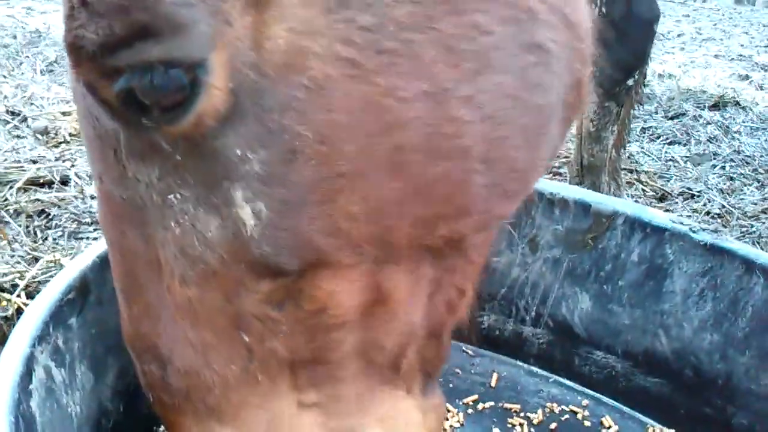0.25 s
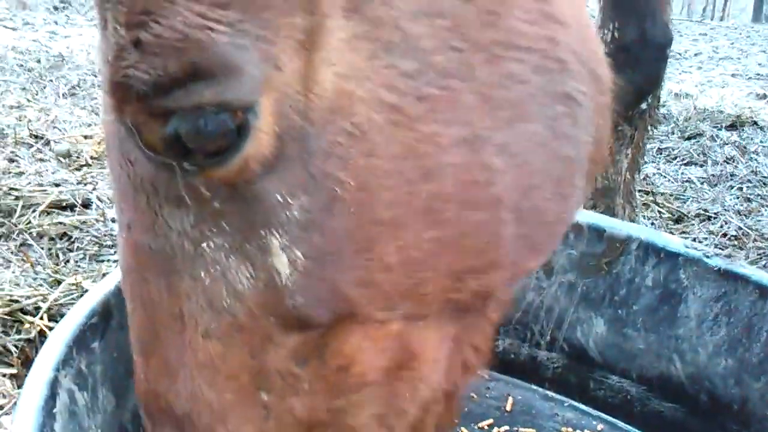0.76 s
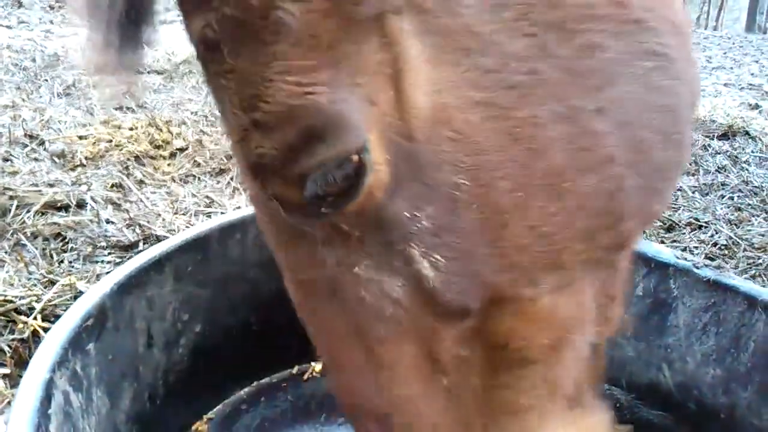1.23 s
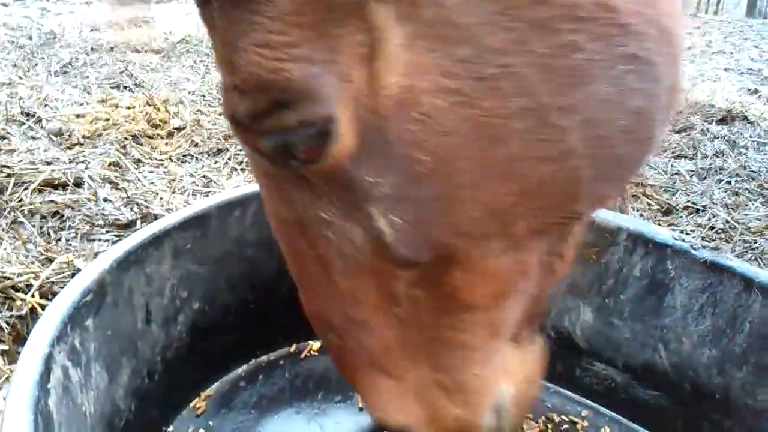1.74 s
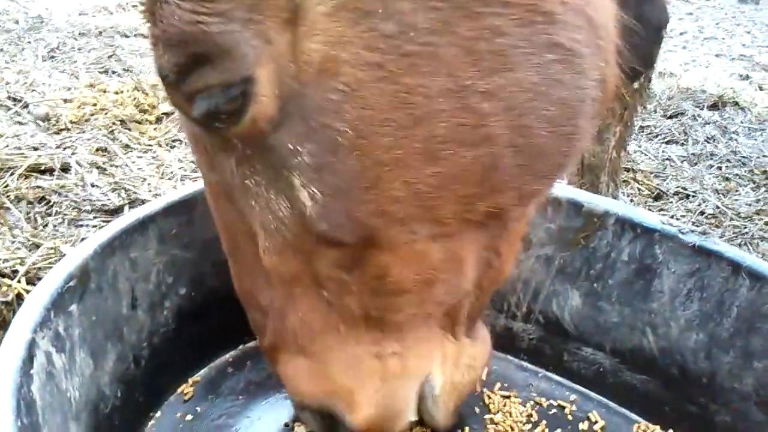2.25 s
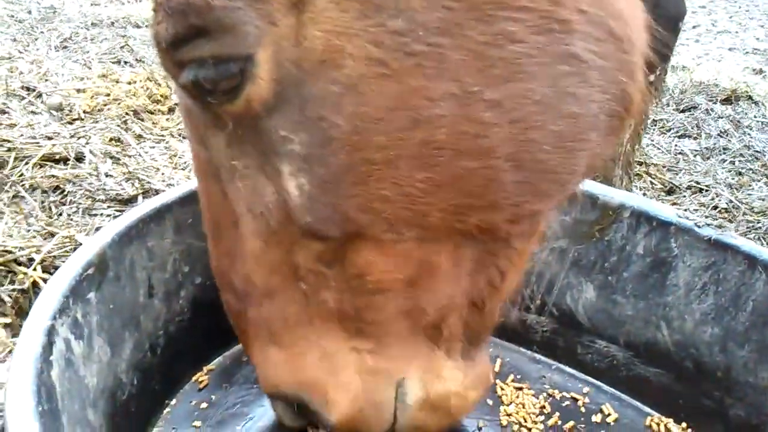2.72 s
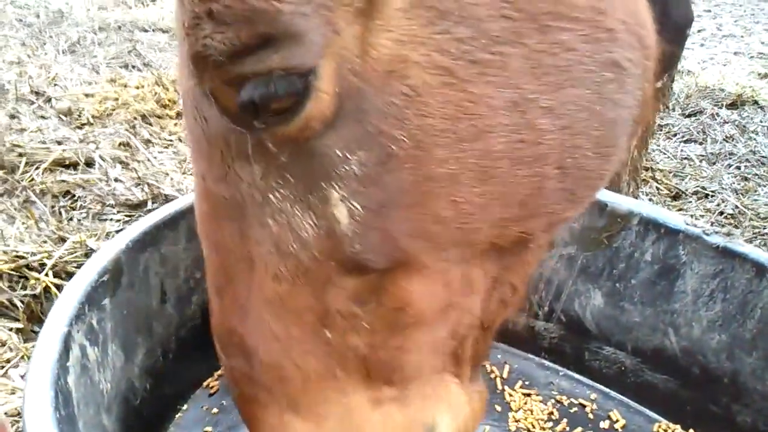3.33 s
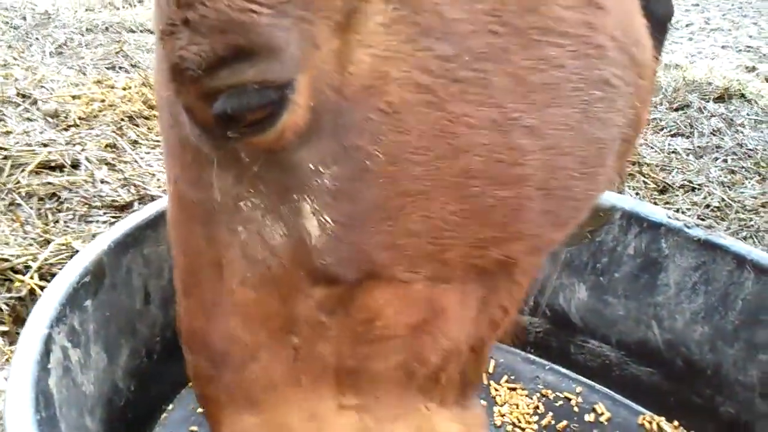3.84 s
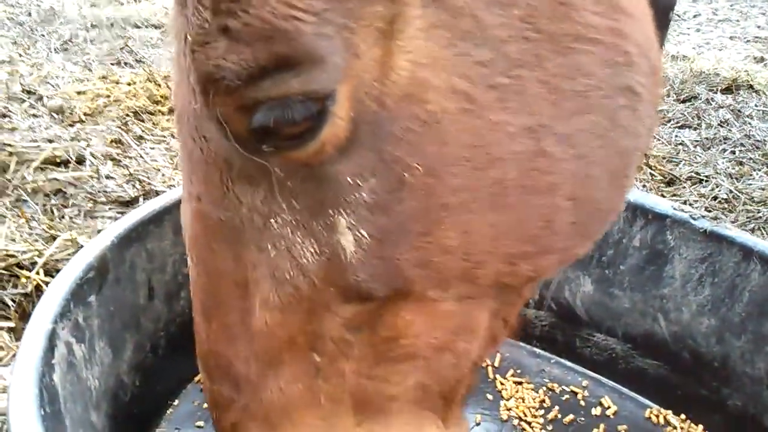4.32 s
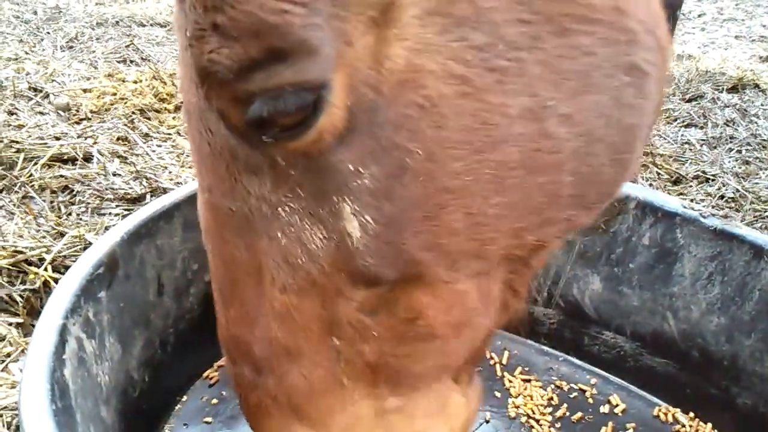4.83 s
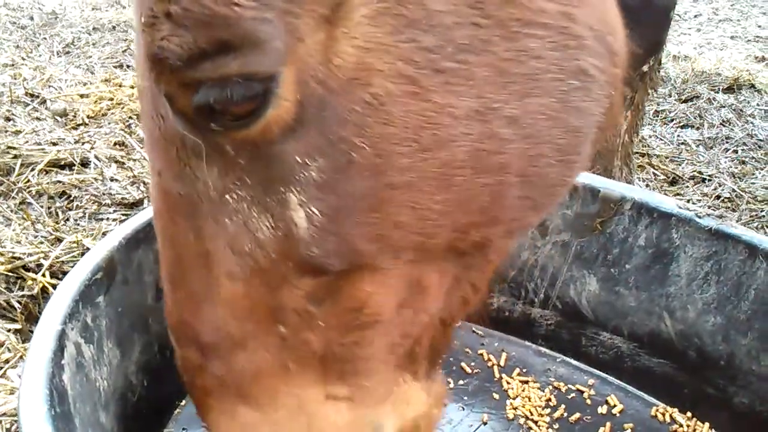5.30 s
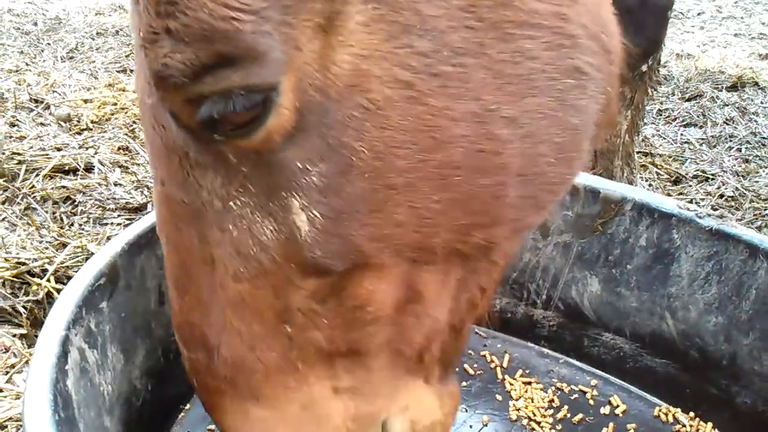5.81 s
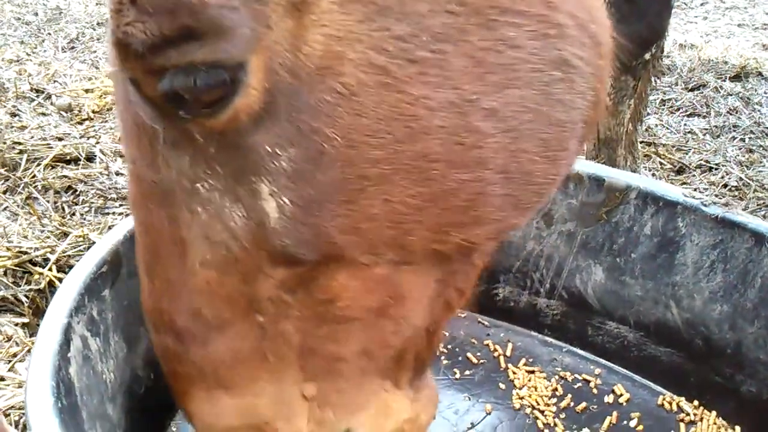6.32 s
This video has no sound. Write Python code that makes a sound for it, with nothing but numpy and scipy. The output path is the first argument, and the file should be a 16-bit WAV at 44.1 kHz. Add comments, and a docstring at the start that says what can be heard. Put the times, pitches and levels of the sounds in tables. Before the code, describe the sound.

Close crunching, snapping and rustling as a horse eats pellets from a plastic tub outdoors, its muzzle thudding softly on the bottom.

```python
"""Close crunching and knocking: a horse mouths feed pellets in a plastic tub outdoors.
Pellets crack, snap and tick, and are ground and swept about; each contact rings the tub's modes.
The muzzle rumbles and bumps the tub floor. Far off, a small bird gives two rising-falling calls
over a faint, freshening breeze, hiss and a thin high tone."""
import sys
import numpy as np
from scipy import signal
from scipy.fft import rfft, irfft, next_fast_len
from scipy.io import wavfile

SR = 44100
rng = np.random.default_rng(int(sys.argv[2]) if len(sys.argv) > 2 else 0)


def bounce(signal):
    """Save signal as a 16-bit WAV file at the path given by the first command-line argument."""
    frames = np.transpose(np.atleast_2d(signal))
    limited = np.clip(frames, -1, 1)
    pcm = np.round(limited * 32767).astype(np.int16)
    wavfile.write(sys.argv[1], SR, pcm)


N = 289296

# modes of tub wall and hollow: freq_hz, gain_db, base_t60_s
TUB_MODES = [(321, -0.5, 0.092), (507.6, -3.5, 0.068), (634, 5, 0.03), (873.6, 3.5, 0.035),
             (1007, 8, 0.023), (1335, 6, 0.018), (1510, 6, 0.015), (1757, 6, 0.02), (1990, -1.5, 0.031),
             (2277, -4.5, 0.025), (2745, -1, 0.016), (3340, 4, 0.015), (3692, -3, 0.05), (4090, 9.5, 0.015),
             (4490, 6, 0.016), (5490, 11.5, 0.0066), (6210, 10, 0.0093), (6720, 12, 0.0069),
             (8020, 6, 0.0085), (9220, 15.5, 0.0036), (10060, 9, 0.011), (11170, 17, 0.0029),
             (13160, 12.5, 0.0046), (13750, 12.5, 0.0057), (15200, 20, 0.0021)]


def pellet_cracks(grind_db):
    """Pellets crack and knock; lesser cracks fall at random, louder under harder grinding."""
    # start_s, peak_db, centre_hz, spread_oct, crumble_s
    main_cracks = [(0.052, -32.5, 1470, 0.58, 0.0065), (0.103, -33, 2500, 1.6, 0.003),
                   (0.386, -31, 3860, 1.1, 0.0043), (0.473, -37, 880, 0.46, 0.0024),
                   (0.537, -31.5, 960, 0.98, 0.0065), (0.598, -29.5, 2020, 0.79, 0.0039),
                   (0.671, -35, 2980, 0.77, 0.002), (0.806, -17.5, 1790, 1.2, 0.0039),
                   (0.855, -28.5, 1030, 1.5, 0.0037), (0.871, -39, 1300, 1.1, 0.003),
                   (0.933, -32, 3830, 0.33, 0.003), (0.953, -30.5, 1260, 1.1, 0.0041),
                   (1.029, -31.5, 1480, 0.83, 0.012), (1.045, -28, 1500, 1.1, 0.0066),
                   (1.136, -24.5, 931, 0.8, 0.0025), (1.195, -22, 724, 0.93, 0.0015),
                   (1.252, -20.5, 3000, 0.8, 0.0036), (1.266, -21, 900, 0.6, 0.0032),
                   (1.294, -19, 686, 0.88, 0.0025), (1.314, -29, 880, 1.1, 0.0044),
                   (1.3275, -10, 1920, 0.78, 0.0049), (1.336, -14, 1520, 1.1, 0.0019),
                   (1.340, -20, 1980, 0.63, 0.0029), (1.3455, -7, 1910, 1.03, 0.0044),
                   (1.352, -23, 1320, 1.1, 0.0056), (1.394, -20, 5800, 0.15, 0.0011),
                   (1.385, -20, 1020, 1.3, 0.001), (1.511, -19, 930, 1.05, 0.00069),
                   (1.578, -21.5, 614, 0.87, 0.0018), (1.63, -23.5, 1430, 0.19, 0.0052),
                   (1.851, -21.5, 1500, 0.48, 0.0071), (1.886, -25, 620, 0.32, 0.0041),
                   (2.038, -19.5, 780, 1.5, 0.0021), (2.078, -27, 1950, 0.85, 0.0027),
                   (2.13, -16, 1810, 0.94, 0.0022), (2.268, -11, 670, 0.68, 0.0044),
                   (2.335, -25.5, 1920, 0.41, 0.0026), (2.481, -26.5, 550, 0.39, 0.0026),
                   (2.634, -20, 1700, 1.4, 0.0028), (2.694, -15, 4040, 0.24, 0.0053),
                   (3.061, -20.5, 1170, 1.3, 0.0033), (3.166, -24.5, 1800, 0.88, 0.0075),
                   (3.423, -22.5, 1390, 1.1, 0.0013), (3.53, -21, 674, 0.63, 0.0015),
                   (3.538, -13, 1080, 1.1, 0.0036), (3.56, -28, 1060, 0.54, 0.004),
                   (3.854, -15.5, 1450, 0.93, 0.0015), (3.873, -19.5, 1040, 0.51, 0.0053),
                   (3.912, -27, 820, 0.4, 0.0026), (3.932, -21.5, 880, 0.39, 0.012),
                   (4.28, -27.5, 2000, 0.25, 0.005), (4.572, -23.5, 880, 0.47, 0.0081),
                   (4.973, -17, 1300, 1.27, 0.0033), (5.028, -14, 1410, 1.05, 0.011),
                   (5.234, -25.5, 1670, 0.53, 0.0029), (5.26, -24, 2100, 1.2, 0.021),
                   (5.348, -18, 2760, 0.51, 0.0046), (5.362, -20.5, 860, 1.5, 0.0041),
                   (5.426, -37, 1710, 0.33, 0.0018), (5.444, -6, 2330, 0.34, 0.0016),
                   (5.447, -9, 2640, 0.14, 0.0011), (5.475, -27, 1300, 0.9, 0.0086),
                   (5.504, -15.5, 3460, 0.1, 0.0035), (5.505, -22, 2010, 0.24, 0.0026),
                   (5.588, -17, 3620, 0.26, 0.0032), (5.643, -23, 1150, 0.47, 0.0036),
                   (5.822, -27, 1240, 0.22, 0.0028), (5.841, -28, 1350, 0.36, 0.0018),
                   (5.971, -24, 740, 1.34, 0.01), (6.365, -26.5, 1630, 0.41, 0.0094)]
    count, low_hz, high_hz, spread_oct, crumble_s = 180, 1200, 8000, 0.9, 0.0012
    when, pitch, size = rng.random((count, 3)).T
    starts = (when * (N - 1)).astype(int)
    peak_db = -32 + 0.6 * (grind_db[starts] - grind_db.mean()) + 4.5 * (2 * size - 1)
    centre_hz = low_hz * (high_hz / low_hz) ** pitch
    lesser = [(at / SR, db, hz, spread_oct, crumble_s) for at, db, hz in zip(starts, peak_db, centre_hz)]
    return fractures(main_cracks + lesser, scatter_db=3.5, t60_scale=0.48, grit_db=-10)


def skin_snaps():
    """Pellet skins snap: a bright body with a finer spray of splinters above it."""
    # start_s, peak_db, splinter_relative_db
    snaps = [(0.2837, -30.5, -8), (0.5123, -33.5, -11), (0.598, -32, -4), (0.817, -25, -4),
             (1.0278, -30, 0), (1.046, -28, -1), (1.1365, -27, -5), (1.2326, -22, -9), (1.313, -25, -13),
             (1.3274, -16.5, -11), (1.346, -14.5, -4), (1.445, -28.5, -10), (1.5048, -28, -27),
             (1.705, -38, -17), (2.0017, -28, -10), (2.0662, -33, -15), (2.378, -25, -21), (2.6, -24, -26),
             (2.6927, -27, -23), (2.794, -35, -18), (2.892, -41, -20), (3.7773, -39, -15),
             (4.004, -27.5, -15), (4.3404, -33, -17), (4.4306, -31.5, -9), (4.5725, -20, -9),
             (4.681, -28, -18), (4.8374, -28, -22), (4.9247, -28, -21), (5.031, -19.5, -3.5),
             (5.2613, -24.5, -25), (5.445, -29.5, 7), (5.4807, -23.5, -17), (5.186, -35, -18),
             (5.6231, -35, -4), (6.0413, -21.5, -25.5)]
    skin_hz, skin_oct, splinter_hz, splinter_oct, crumble_s = 5740, 0.39, 12000, 0.87, 0.0041
    skins = [(s, db, skin_hz, skin_oct, crumble_s) for s, db, _ in snaps]
    splinters = [(s, db + rel_db, splinter_hz, splinter_oct, crumble_s / 2) for s, db, rel_db in snaps]
    return fractures(skins + splinters, scatter_db=1, t60_scale=0.41, grit_db=-8.5)


def pellet_ticks():
    """Pellets flicked together: short dry clicks in the highest modes."""
    # start_s, peak_db
    ticks = [(0.3454, -46), (0.4, -36), (0.4718, -43), (0.5197, -34), (0.5754, -34), (0.656, -29),
             (0.7422, -37), (0.7682, -39), (0.8345, -37), (0.8884, -36), (0.9602, -52), (1.1598, -45),
             (1.3004, -32), (1.3354, -19), (1.3414, -26), (1.6177, -29), (1.7756, -27), (2.2672, -22),
             (2.8674, -34), (2.8922, -16), (3.042, -27), (3.0639, -30), (3.231, -31), (3.267, -33),
             (3.2994, -33), (3.4715, -28), (3.5853, -27), (3.7125, -25), (3.9, -25), (3.9494, -25),
             (4.5381, -33), (4.8973, -38), (5.1407, -26), (5.772, -23), (6.2886, -34), (6.3969, -32)]
    centre_hz, spread_oct, crumble_s = 12100, 0.54, 0.00079
    events = [(start_s, peak_db, centre_hz, spread_oct, crumble_s) for start_s, peak_db in ticks]
    return fractures(events, scatter_db=3, t60_scale=0.3, grit_db=-10)


def fractures(events, scatter_db, t60_scale, grit_db):
    """One click, then a burst of crumbling grit, rung through the tub."""
    out = np.zeros(N)
    for start_s, peak_db, centre_hz, spread_oct, crumble_s in events:
        mode_db = scatter_db * rng.standard_normal((len(TUB_MODES), 1))
        grit = rng.standard_normal(900)
        age = np.arange(len(grit)) / SR / crumble_s
        force = from_db(grit_db) * grit * np.sqrt(age) * np.exp(-2 * age)
        force[0] = 1   # the click
        sound = signal.fftconvolve(struck_tub(centre_hz, spread_oct, t60_scale, mode_db), force)
        add(out, start_s, from_db(peak_db) * sound / np.abs(sound).max())
    return out


def struck_tub(centre_hz, spread_oct, t60_scale, mode_db=0):
    """Tub impulse response; modes near the contact's pitch ring most."""
    rise_cycles = 0.4
    t = np.arange(2600) / SR
    hz, gain_db, t60_s = np.transpose(TUB_MODES)[:, :, None]
    signs = (-1) ** np.arange(len(TUB_MODES))[:, None]
    focus_db = -6 * (np.log2(hz / centre_hz) / max(spread_oct, 0.15)) ** 2
    decay_db = -60 * t / (t60_scale * t60_s)
    modes = signs * from_db(gain_db + focus_db + mode_db + decay_db) * np.sin(2 * np.pi * hz * t)
    rise = (1 - np.exp(-t * centre_hz / rise_cycles)) ** 2
    return rise * modes.sum(axis=0)


def chewing(grind_db, rattle_db, crackle_db):
    """One uneven lip motion drives small contacts in three bands; gentle nibbling thins them."""
    lips = drift(30)
    density_db = 0.79 * (rattle_db - rattle_db.mean())
    low = contacts(2500, uneven_db=5, clump_db=density_db + 3 * lips + 2.7 * drift(25))
    grind = from_db(grind_db) * pellet_bed(low, 400, 2500, t60_scale=0.65)
    mid = contacts(1300, uneven_db=4.5, clump_db=density_db + 3.5 * lips + 2.8 * drift(30))
    rattle = from_db(rattle_db) * pellet_bed(mid, 2500, 7500, t60_scale=0.7)
    high = contacts(2500, uneven_db=3.5, clump_db=density_db + 1.8 * lips + 3.4 * drift(50))
    crackle = from_db(crackle_db) * pellet_bed(high, 7500, 16000, t60_scale=0.7)
    return grind + rattle + crackle


def contacts(base_per_s, uneven_db, clump_db):
    """Random clicks of uneven size; clump_db modulates their rate."""
    hits = rng.random(N) < base_per_s * from_db(clump_db) / SR
    size_db = uneven_db * np.minimum(rng.exponential(1, N), 4)
    return hits * from_db(size_db) * rng.choice([-1, 1], N)


def pellet_bed(clicks, low_hz, high_hz, t60_scale):
    """Each contact rings a random third of the tub modes in a band; rms 1."""
    modes = [mode for mode in TUB_MODES if low_hz <= mode[0] < high_hz]
    picks = rng.random((len(modes), N)) < 1 / 3
    return unit_rms(sum(from_db(gain_db) * ring(clicks * pick, hz, t60_scale * t60_s)
                        for (hz, gain_db, t60_s), pick in zip(modes, picks)))


def lip_sweeps():
    """Lips push pellets along the tub; dense contacts swell and ebb with each stroke."""
    # start_s, length_s, level_db, centre_hz, spread_oct
    strokes = [(0.01, 0.089, -44.5, 850, 0.17), (0.313, 0.063, -52, 635, 0.36),
               (0.835, 0.085, -51, 950, 0.28), (1.199, 0.21, -34.5, 810, 0.88),
               (1.18, 0.24, -37, 2520, 0.54), (2.037, 0.14, -42, 1840, 0.14),
               (2.038, 0.12, -40, 3860, 0.86), (2.297, 0.14, -49.5, 1820, 0.54),
               (2.627, 0.13, -38, 1520, 0.63), (2.631, 0.1, -42, 3870, 0.68),
               (2.903, 0.11, -47, 1490, 0.28), (3.161, 0.071, -44.5, 594, 1.2),
               (3.29, 0.066, -48, 4000, 0.83), (3.516, 0.065, -40.5, 1500, 2.1),
               (3.649, 0.088, -41.5, 640, 0.85), (3.918, 0.035, -37, 3350, 0.41),
               (3.863, 0.16, -40.5, 650, 1.1), (3.97, 0.2, -44, 606, 0.92), (4.18, 0.24, -46, 830, 0.3),
               (4.496, 0.11, -42.5, 820, 0.69), (4.89, 0.23, -48, 1090, 0.73),
               (5.635, 0.087, -43, 790, 1.5), (5.838, 0.085, -46, 4400, 1.06),
               (6.358, 0.1, -50, 1450, 0.21)]
    clicks = contacts(1500, uneven_db=3.5, clump_db=4.3 * drift(60))
    out = np.zeros(N)
    for start_s, length_s, level_db, centre_hz, spread_oct in strokes:
        size = round(length_s * SR)
        force = clicks[round(start_s * SR):][:size] * np.sqrt(np.hanning(size))
        sound = signal.fftconvolve(struck_tub(centre_hz, spread_oct, t60_scale=0.53), force)
        add(out, start_s, from_db(level_db) * unit_rms(sound))
    return out


def tub_radiation(pellets):
    """Small contacts radiate no bass; the far wall reflects them once."""
    echo_s, echo_db = 0.002473, -19.5
    direct = highpass(pellets, hz=220)
    out = direct.copy()
    add(out, echo_s, from_db(echo_db) * direct)
    return out


def muzzle_bumps():
    """The soft muzzle presses the floor; two low modes swell and ring."""
    # start_s, level_db, pitch_hz
    bumps = [(0.579, -35.5, 147), (0.765, -37, 174), (1.072, -36, 256), (1.658, -32.5, 193),
             (1.868, -30.5, 210), (2.265, -40.5, 265), (2.321, -37, 182), (2.479, -28.5, 262.7),
             (2.711, -34, 221), (3.322, -37.5, 304), (3.515, -37, 222), (3.581, -31.5, 204),
             (3.92, -26, 335), (4.365, -34, 204), (4.757, -37.5, 253), (4.926, -39.5, 218),
             (5.04, -38.5, 219), (5.5, -42, 222), (5.316, -26, 295.6), (5.344, -31, 288),
             (5.682, -35.5, 250), (5.769, -40, 210), (5.974, -30.5, 312), (6.099, -37.5, 236),
             (6.228, -30, 190), (6.332, -30, 211)]
    swell_s, t60_s, second_ratio, second_db = 0.009, 0.1, 0.816, -6
    out, t = np.zeros(N), np.arange(9000) / SR
    envelope = (1 - np.exp(-t / swell_s)) * from_db(-60 * t / t60_s)
    for start_s, level_db, pitch_hz in bumps:
        phase = 2 * np.pi * pitch_hz * t
        thud = envelope * (np.sin(phase) + from_db(second_db) * np.sin(second_ratio * phase))
        add(out, start_s, from_db(level_db) * thud / np.abs(thud).max())
    return out * from_db(4 * drift(50))   # dragging lips roughen the ring


def muzzle_rumble(level_db):
    """Low, uneven noise of the working muzzle."""
    # freq_hz, gain_db
    spectrum = [(53, -31), (90, -12.5), (139, -6), (200, 2.5), (280, 2), (403, -8.5), (500, -9), (650, -7),
                (1100, -41)]
    rubbing = rng.standard_normal(N) * from_db(2.5 * drift(25) + 2.5 * drift(6))
    return from_db(level_db) * coloured(rubbing, spectrum)


def bird():
    """Thin whistles, rising then falling, that waver over the field and echo once."""
    # note_fraction, pitch_hz
    rising = [(0, 7400), (.1, 8450), (.35, 8560), (1, 9850)]
    falling = [(0, 7000), (.13, 8650), (.4, 8250), (.82, 8150), (1, 6700)]
    # start_s, rising_db, falling_db
    calls = [(.085, -62, -59), (3.342, -60, -53)]
    rise_s, pause_s, fall_s, edge_s = 0.19, 0.028, 0.13, 0.006
    echo_s, echo_db = 0.05, -7
    out, waver_db, warble_hz = np.zeros(N), 1.5 * drift(40), 70 * drift(120)
    for call_s, rising_db, falling_db in calls:
        notes = [(call_s, rise_s, rising, rising_db),
                 (call_s + rise_s + pause_s, fall_s, falling, falling_db)]
        for start_s, length_s, glide, level_db in notes:
            t = np.arange(0, length_s, 1 / SR)
            hz = np.interp(t / length_s, *np.transpose(glide)) + warble_hz[round(start_s * SR):][:len(t)]
            fade = np.minimum(np.minimum(t, length_s - t) / edge_s, 1)
            note = fade * tone(hz, level_db)
            add(out, start_s, note)
            add(out, start_s + echo_s, from_db(echo_db) * note)
    return out * from_db(waver_db)


def breeze():
    """Faint air noise and hiss, slowly freshening."""
    # freq_hz, gain_db
    spectrum = [(18, -48), (36, -6), (55, 3.5), (227, 3.5), (437, -11), (584, -41), (740, -26), (937, -1.5),
                (1720, -5.5), (2680, -9), (4300, -7.5), (4910, -9), (6380, -5), (8520, -20.5), (14400, -13),
                (16000, -25)]
    start_db, rise_db_per_s = -52.5, 0.53
    level_db = start_db + rise_db_per_s * np.arange(N) / SR
    return from_db(level_db) * coloured(rng.standard_normal(N), spectrum)


def whine():
    """A faint high tone, slightly unsteady in pitch."""
    return tone(hz=14002 + 3 * drift(4), rms_db=-76)


def from_db(db):
    return 10 ** (np.asarray(db) / 20)


def unit_rms(x):
    return x / np.sqrt(np.mean(x ** 2) + 1e-20)


def add(out, start_s, sound):
    at = round(start_s * SR)
    out[at:at + len(sound)] += sound[:N - at]


def tone(hz, rms_db):
    return np.sqrt(2) * from_db(rms_db) * np.sin(2 * np.pi * np.cumsum(hz) / SR)


def highpass(x, hz):
    return signal.sosfilt(signal.butter(3, hz, "high", fs=SR, output="sos"), x)


def drift(rate_hz):
    """Smooth random wander; rms 1."""
    r = np.exp(-2 * np.pi * rate_hz / SR)
    return unit_rms(signal.lfilter([1], [1, -2 * r, r * r], rng.standard_normal(N + SR))[SR:])


def ring(clicks, hz, t60_s):
    """One mode: each click starts a decaying sine."""
    r, w = from_db(-60 / (t60_s * SR)), 2 * np.pi * hz / SR
    return signal.lfilter([0, np.sin(w)], [1, -2 * r * np.cos(w), r * r], clicks + 1e-18)


def coloured(x, spectrum):
    """Filter by (freq_hz, gain_db) points; rms 1."""
    size = next_fast_len(N)
    hz, gain_db = np.transpose(spectrum)
    bins_hz = np.fft.rfftfreq(size, 1 / SR) + 1
    gain = from_db(np.interp(np.log(bins_hz), np.log(hz), gain_db))
    return unit_rms(irfft(rfft(x, size) * gain, size)[:N])


def scene():
    """Pellets and muzzle in the tub over the far background; mono."""
    # mouth effort: time_s, grind_db, rattle_db, crackle_db, rumble_db
    effort = [(0.0, -41, -46, -54, -39), (0.16, -49.5, -52, -50.5, -37.5), (0.26, -51, -64.5, -54, -46.5),
              (0.32, -55, -55.5, -51, -46), (0.44, -56.5, -54.5, -51, -51.5),
              (0.75, -54.5, -52, -57.5, -45), (0.87, -44, -47.5, -51, -46.5),
              (0.99, -49, -54.5, -58, -50.5), (1.07, -43, -49, -53, -51), (1.3, -35, -43.5, -51, -39.5),
              (1.62, -45, -48.5, -53.5, -50), (1.8, -43.5, -49.5, -51.5, -39.5),
              (2.05, -41, -45.5, -50.5, -46), (2.45, -42, -47, -51, -43.5),
              (2.75, -47, -43.5, -50.5, -40.5), (3.05, -41, -46, -50.5, -46.5),
              (3.33, -45, -44.5, -48, -51), (3.62, -47, -45, -48, -46), (3.9, -38.5, -43.5, -50, -46.5),
              (4.15, -43.5, -46, -51.5, -48), (4.4, -41.5, -46.5, -50, -43.5), (4.6, -50, -46, -50, -56.5),
              (5.2, -47.5, -46, -52, -47), (5.44, -41, -46, -49.5, -50.5), (5.9, -49, -46, -51.5, -47),
              (6.16, -50.5, -46, -51, -49), (6.45, -45.5, -50.5, -55, -47), (6.56, -52, -49.5, -64, -54)]
    time_s, *columns = np.transpose(effort)
    t = np.arange(N) / SR
    grind_db, rattle_db, crackle_db, rumble_db = [np.interp(t, time_s, db) for db in columns]
    rumble = muzzle_rumble(rumble_db)
    stirring = chewing(grind_db, rattle_db, crackle_db) + lip_sweeps()
    background = breeze() + whine() + bird()
    breaking = skin_snaps() + pellet_ticks() + pellet_cracks(grind_db)
    return (tub_radiation(breaking + stirring) + muzzle_bumps() + rumble + background)[None]


def record(dry):
    """A small microphone loses the deep bass; the top is cut steeply."""
    top_hz = 15720
    lowpass = signal.ellip(12, 0.1, 70, top_hz, fs=SR, output="sos")
    return signal.sosfilt(lowpass, highpass(dry, hz=29.8))


dry = scene()
out = record(dry)
bounce(out)
```